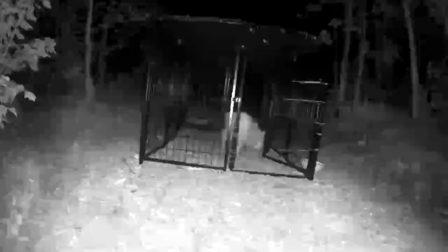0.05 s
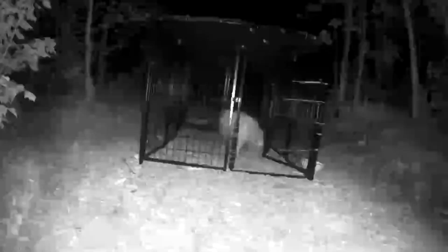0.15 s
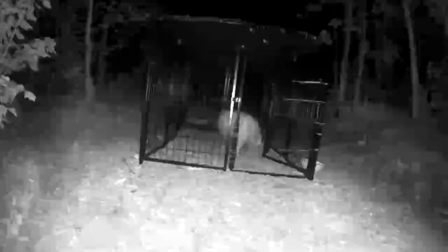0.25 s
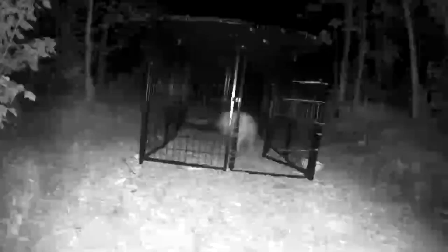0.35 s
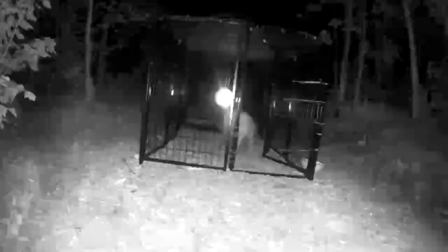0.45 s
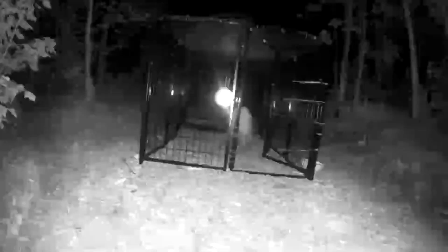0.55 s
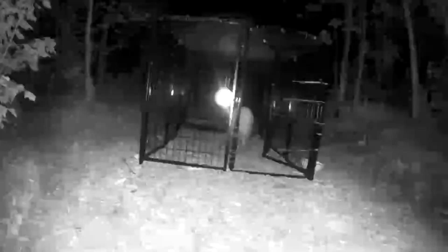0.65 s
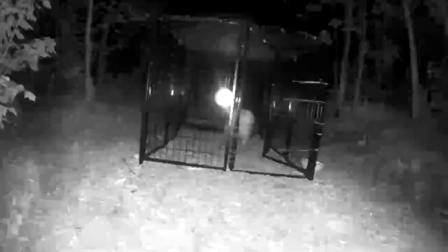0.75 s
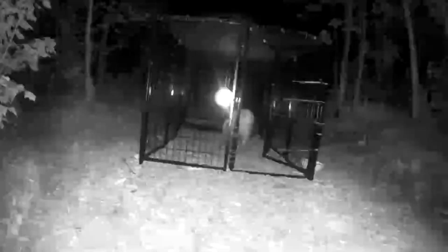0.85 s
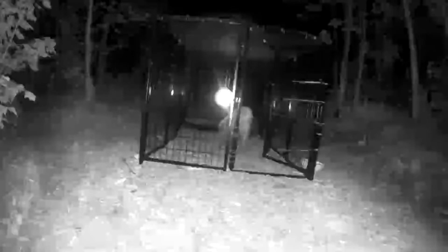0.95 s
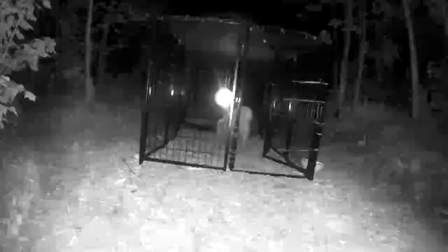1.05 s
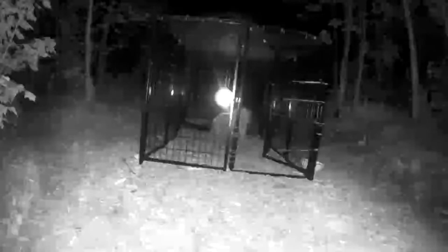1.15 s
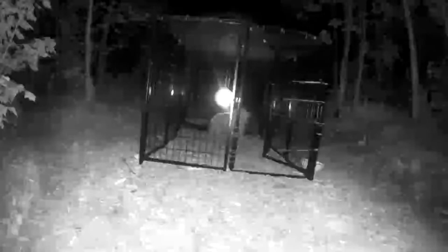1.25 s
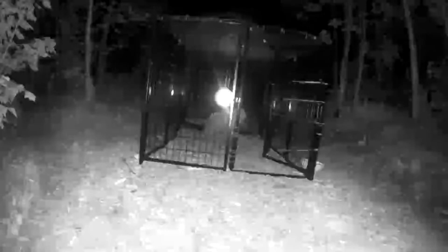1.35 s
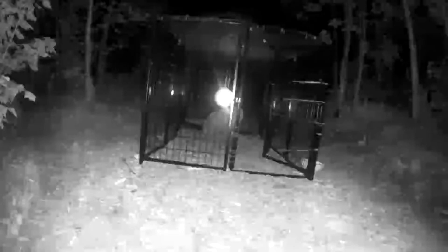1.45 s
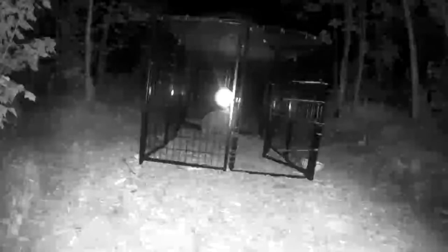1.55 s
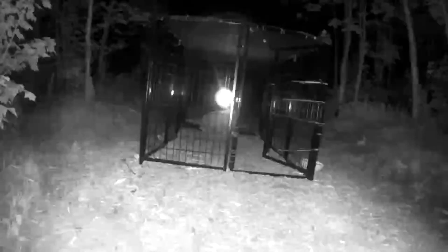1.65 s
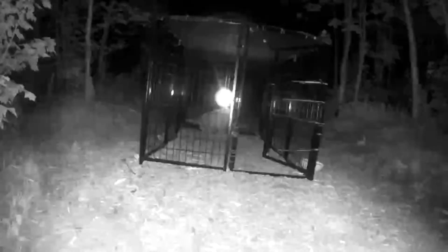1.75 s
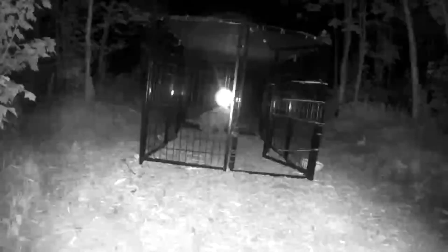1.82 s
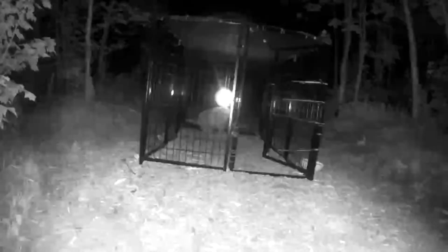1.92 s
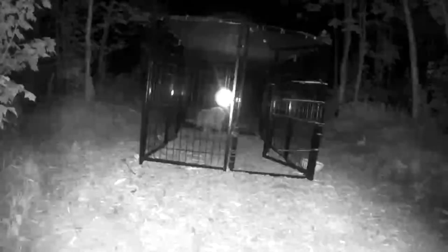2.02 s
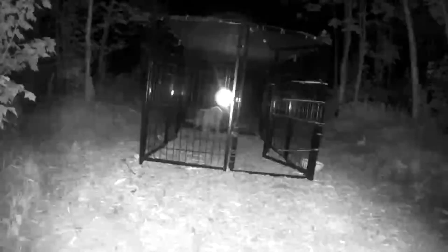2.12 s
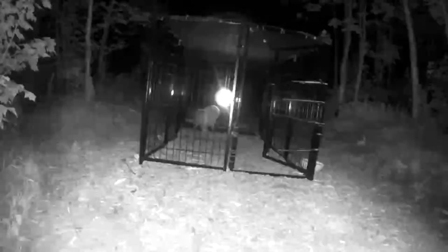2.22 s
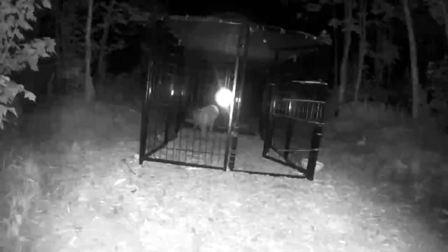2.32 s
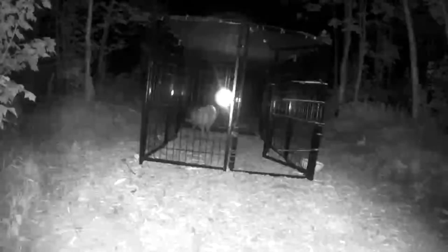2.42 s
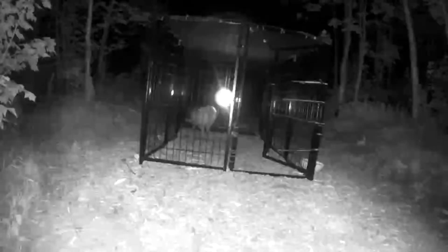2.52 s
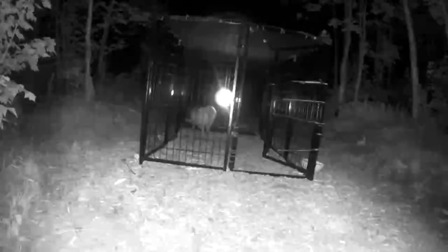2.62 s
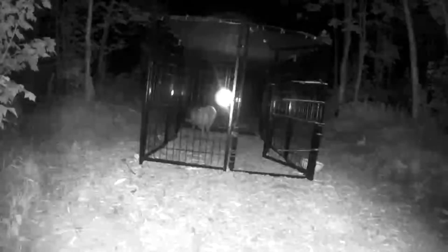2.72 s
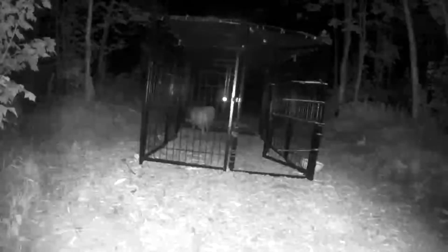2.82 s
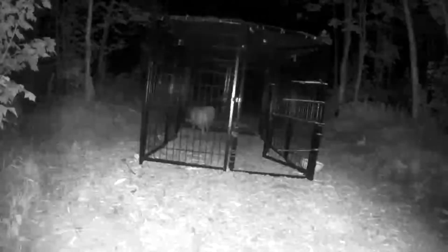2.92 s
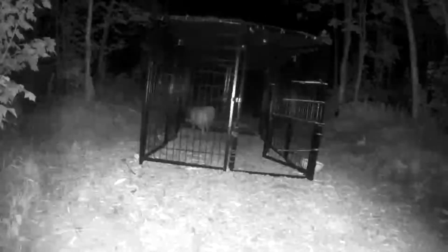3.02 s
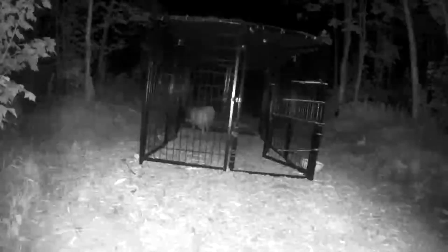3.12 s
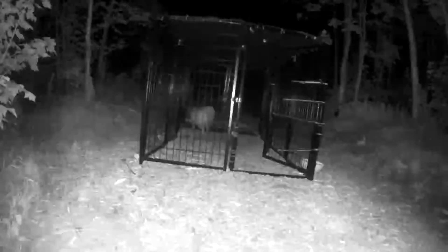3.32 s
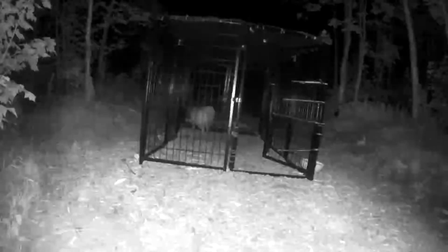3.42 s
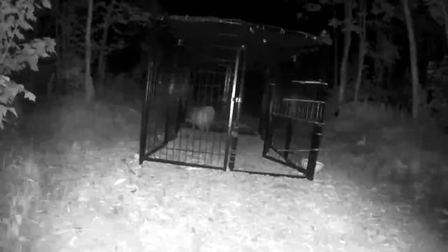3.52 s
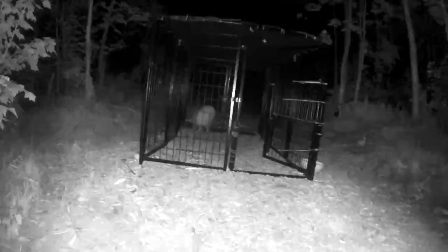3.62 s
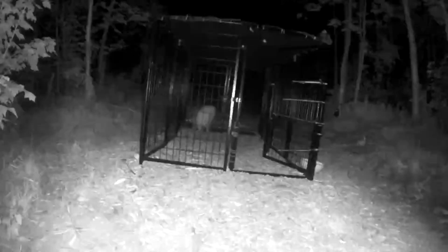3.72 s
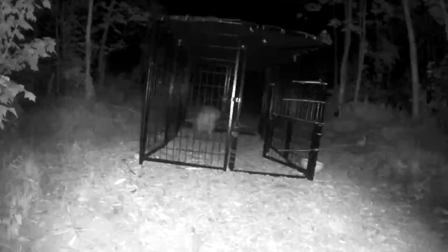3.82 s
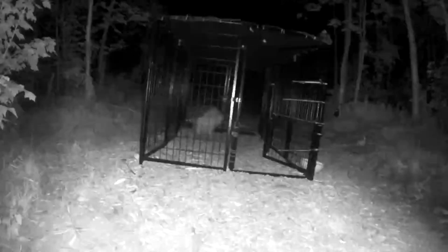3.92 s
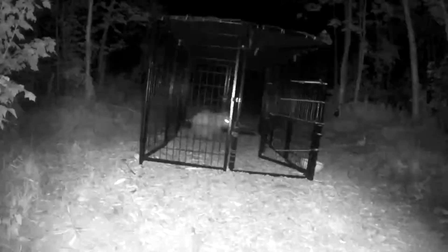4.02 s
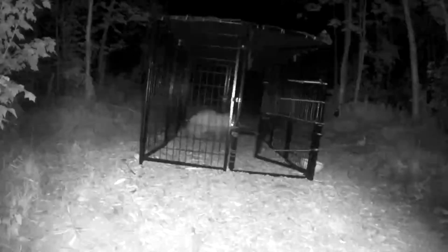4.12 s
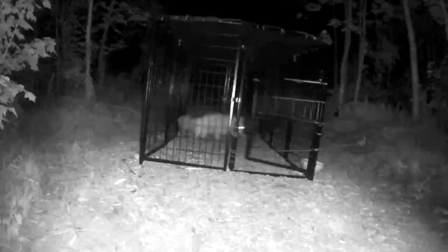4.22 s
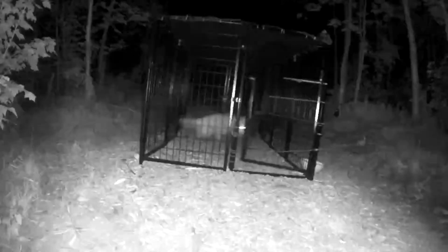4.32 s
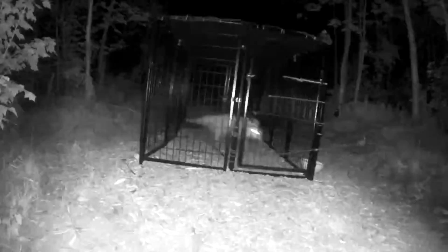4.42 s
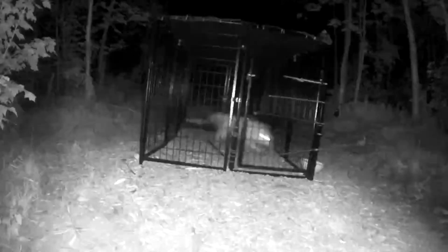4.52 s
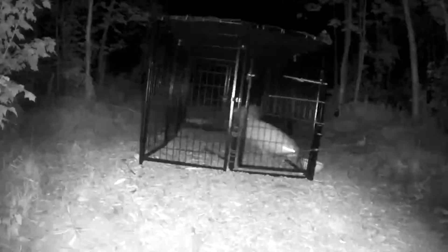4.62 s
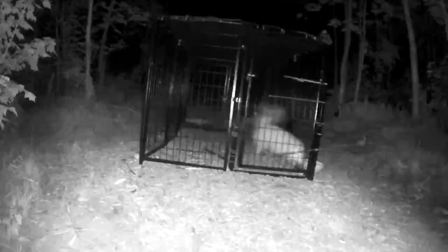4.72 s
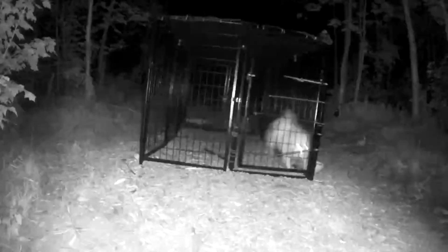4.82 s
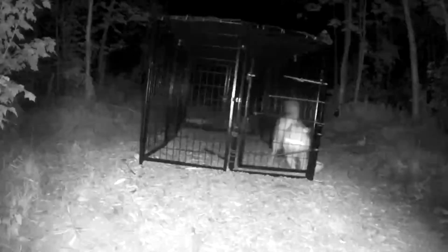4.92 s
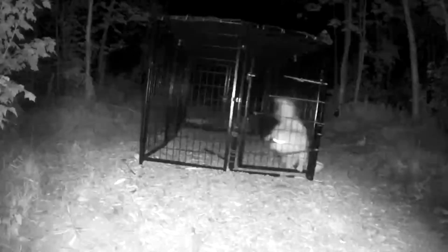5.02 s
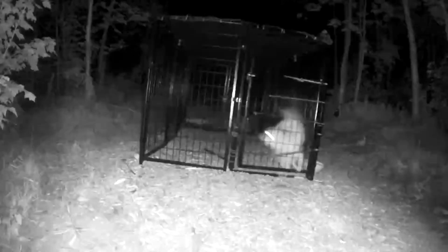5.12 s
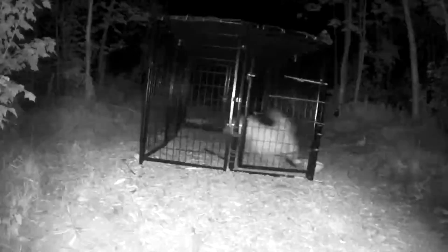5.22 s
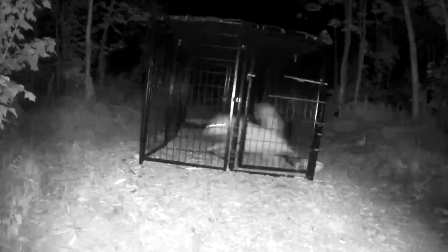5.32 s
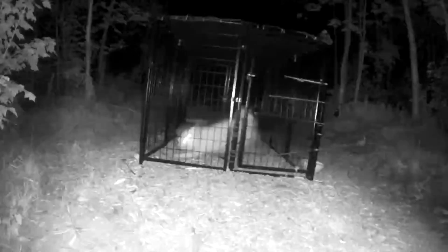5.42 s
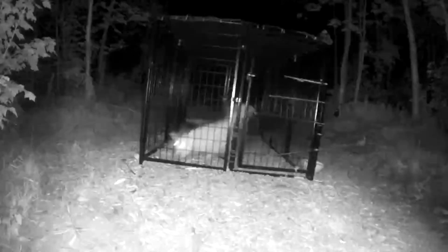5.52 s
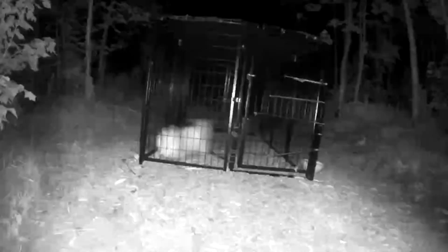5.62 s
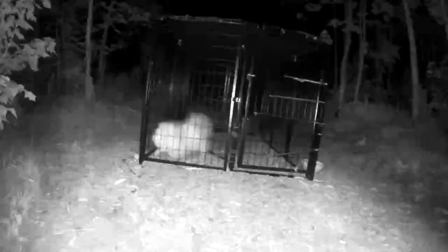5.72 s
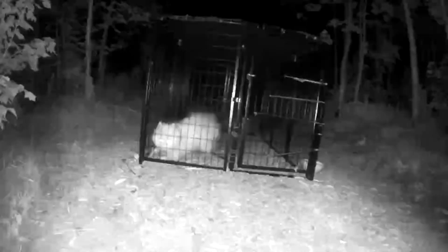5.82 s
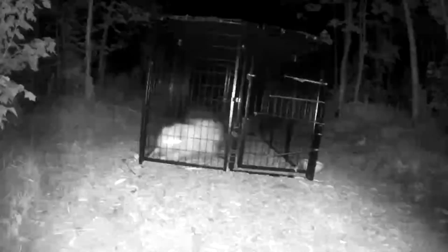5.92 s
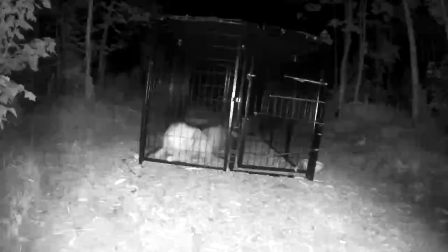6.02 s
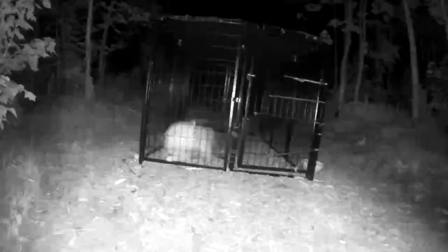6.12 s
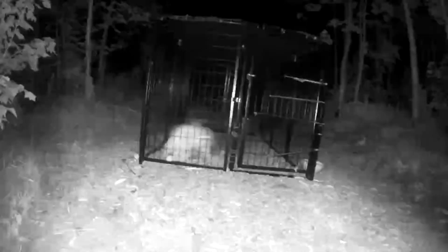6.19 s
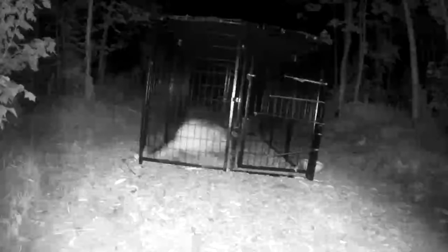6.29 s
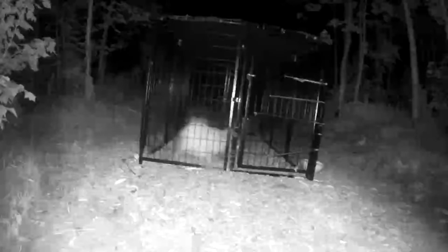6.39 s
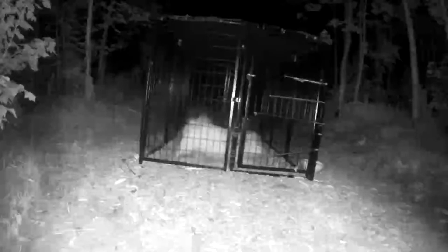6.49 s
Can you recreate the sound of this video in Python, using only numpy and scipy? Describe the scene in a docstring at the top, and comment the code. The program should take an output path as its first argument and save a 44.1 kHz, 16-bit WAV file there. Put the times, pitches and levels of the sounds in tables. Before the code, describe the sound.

A quiet wood at night, heard through a trail camera with a faint hiss and hum. A katydid buzzes softly, high and fast, over a distant insect chorus throughout. At about 3.5 seconds an animal's paws tap lightly on the floor of a steel cage trap. Wires begin to clink at 4 seconds, and at about 4.3 the door slams shut with a loud cluster of clanks, a low jolt and jangling mesh. Sharp, bright metal strikes continue until about 5 seconds, followed by a couple of knocks on the bars. From 5.4 to 6.2 seconds the animal throws itself against the sides: panels chatter, the shut door rattles, and feet thud dully on earth and scuffle in dry leaves. The metal rings briefly, with a thin echo from the trees. A last soft thud and light knock come at about 6.4 seconds.

```python
"""A wood at night, heard through a trail camera that hums faintly. A katydid buzzes by stridulation over
a far insect chorus. An animal steps about in a steel cage trap, the door slams shut, and the animal runs
against the mesh: impacts excite the modes of bars and wires, while feet thud on the earth and scuffle
in dry leaves. The trees scatter a thin reverberation, and the camera turns its gain down at the slam."""
import sys
import numpy as np
from scipy import signal
from scipy.fft import rfft, irfft, next_fast_len
from scipy.io import wavfile
from scipy.ndimage import uniform_filter1d

SR = 44100
rng = np.random.default_rng(int(sys.argv[2]) if len(sys.argv) > 2 else 0)


def wav_record(signal):
    """Record a signal, one row per channel, as 16-bit PCM in the file named by sys.argv[1]."""
    frames = np.transpose(np.atleast_2d(signal))
    bounded = np.clip(frames, -1, 1)
    # unit amplitude maps onto the largest positive 16-bit level
    quanta = np.round(bounded * 32767).astype(np.int16)
    wavfile.write(sys.argv[1], SR, quanta)


N = 288855
TIME = np.arange(N) / SR

# spectra of the far insects and of the camera's hiss: frequency_hz, relative_density_db
CHORUS_SPECTRUM = [(3400, -30), (3900, -8), (4200, -2), (4450, -2.5), (4750, 4.5), (5250, 1.5),
                   (5600, -18.5), (6200, -24.5)]
HISS_SPECTRUM = [(10, -5), (30, 3.5), (70, 0), (130, -1.5), (200, -6), (320, -10), (500, -13),
                 (1000, -10.5), (1600, -11), (2800, -14.5), (4000, -14), (5600, -9), (6800, -12),
                 (7500, -20.5)]
# partials of the camera's hum: pitch_hz, rms_db
HUM_PARTIALS = [(55.5, -63.5), (120, -57.5), (166.5, -77), (240, -69), (360, -68)]
# soft paws on the floor of the trap: start_s, peak_db, t60_s
PAW_TAPS = [(3.55, -42.5, 0.14), (3.603, -36.5, 0.063), (3.752, -41.5, 0.19), (3.811, -49.5, 0.11)]
# modes of that floor: pitch_hz, bandwidth_hz, gain_db
TRAP_FLOOR_MODES = [(314, 350, -7.5), (950, 110, -4), (1330, 120, -3.5), (1580, 60, -1), (2040, 810, -9),
                    (2520, 110, -3), (3000, 510, -18.5)]
# bursts of kicking the leaves and shaking the panels: start_s, length_s, leaves_db, panels_db
SCRAMBLE_BURSTS = [(4.215, 0.2, -54, -44.5), (4.524, .18, -43, -36.5), (5.418, 0.1, -42.5, -40.5),
                   (5.633, 0.083, -49, -42), (5.89, 0.042, -46, -52.5), (6.059, 0.029, -55.5, -48)]
# the mesh jangles as the animal turns, after the slam, and as it drops back: start_s, length_s, level_db
MESH_JANGLES = [(3.889, 0.17, -59.5), (4.32, 0.38, -30.5), (5.213, 0.23, -47)]
# spectra of scuffled leaves, loose panels and wires: frequency_hz, relative_density_db
LEAF_SPECTRUM = [(45, -5.5), (70, 2.5), (115, -3), (190, -7.5), (320, -5.5), (480, -9), (800, -7),
                 (1200, -4), (1600, -19), (3500, -34)]
PANEL_SPECTRUM = [(900, -20), (1400, 4.5), (1750, 4.5), (2300, 4.5), (2700, 6.5), (3100, 7), (3900, 3),
                  (4500, -6), (5500, -1)]
WIRE_SPECTRUM = [(3400, -4), (4300, -4), (4700, -2), (5200, 0.5), (5700, 0.5), (6350, 5), (6900, 5),
                 (7300, -2), (7700, -19)]
# modes of the cage that stand above the dense mesh modes: pitch_hz, relative_db, t60_s
STRONG_CAGE_MODES = [(861, 4, .3), (1136, 9, .5), (1250, 6, .45), (1610, 4, .4), (1793, 4, .25),
                     (1861, 6, .25), (2251, 5, .2), (2353, 1, .3), (2835, -2, .3), (3047, 3, .3),
                     (3526, -1, .3), (4049, 5, .35), (4525, -1, .25), (4603, 5, .25), (4792, -3, .2),
                     (4910, -2, .2), (5210, -1, .13), (5460, 0, .25), (5687, 0, .2), (6212, 0, .17),
                     (6346, 3, .2), (6912, 2, .17)]
# the animal's weight on the ground, and the jolt of the slam: start_s, level_db, pitch_hz, t60_s
GROUND_THUDS = [(3.69, -45, 82.6, 0.21), (4.211, -38, 222, 0.23), (4.237, -31, 119, 0.14),
                (4.292, -33, 387, 0.07), (4.365, -37, 430, 0.06), (5.429, -40, 88.8, 0.23),
                (5.499, -49, 120, 0.18), (5.635, -35.5, 85.4, 0.11), (5.781, -49.5, 90, 0.15),
                (5.958, -43, 68, 0.2), (6.101, -37.5, 114, 0.15), (6.381, -43, 106, 0.11)]
# bands in which frame, panels, bars, door, latch and wires ring: low_hz, high_hz
STEEL_BANDS = [(720, 1400), (1480, 2500), (2600, 4100), (4400, 4900), (4950, 5650), (5850, 7200)]
# band weights of each kind of blow: frame_db, panels_db, bars_db, door_db, latch_db, wires_db
WIRE_WEIGHTS = (-24.5, -27, -10.5, -16, -2.5, -1)
SLAM_WEIGHTS = (-17.5, -7.5, -6.5, -15.5, -13, -3)
BAR_WEIGHTS = (-20.5, -24, -1, -9, -8, 0.5)
PANEL_WEIGHTS = (-12, 1.5, -2.5, -5.5, -10.5, -7)
DOOR_WEIGHTS = (-21, -27, -7.5, -1, -15, -8)
# bright, thin strikes on latch and mesh: start_s, level_db, t60_s
WIRE_BLOWS = [(4.055, -47.5, 0.11), (4.094, -46, .11), (4.157, -34, 0.29), (4.188, -26.5, 0.18),
              (4.233, -41.5, 0.087), (4.38, -28, 0.078), (4.46, -29, .076), (4.509, -30, 0.54),
              (4.758, -34, 0.13), (4.847, -33, 0.12), (4.865, -21.5, 0.11), (4.948, -28, 0.05),
              (6.048, -33, 0.53), (6.142, -35, 0.15)]
# hard blows that shake the frame, led by the door hitting its stop and rebounding: start_s, level_db
SLAM_BLOWS = [(4.289, -22), (4.301, -21), (4.32, -35), (4.364, -26.5), (4.423, -27.5), (4.56, -29),
              (5.59, -26.5)]
# knocks on a bar: start_s, level_db
BAR_BLOWS = [(5.037, -32.5), (5.114, -38), (6.437, -43)]
# dull bumps against a side panel: start_s, level_db
PANEL_BLOWS = [(5.397, -39.5), (5.656, -45), (5.912, -34), (6.083, -42.5)]
# the shut door rattling in its guides: start_s, level_db
DOOR_BLOWS = [(5.598, -30), (5.656, -35), (5.699, -27), (5.712, -27.5), (6.054, -32.5), (6.111, -36)]


def from_db(db):
    """Amplitude ratio: a factor of ten per 20 dB."""
    return 10 ** (np.asarray(db) / 20)


def unit_rms(x):
    """Normalisation to unit mean power."""
    return x / np.sqrt(np.mean(x ** 2) + 1e-20)


def decay(t, t60_s):
    """Exponential damping, 60 dB down after t60_s."""
    return np.exp(-np.log(1000) * t / t60_s)


def add(out, start_s, sound):
    """Superposition: a sound sums into the mix from start_s."""
    at = round(start_s * SR)
    out[at:at + len(sound)] += sound[:max(0, N - at)]


def band(x, low_hz, high_hz):
    """Causal band-pass filtering."""
    return signal.sosfilt(signal.butter(2, [low_hz, high_hz], "band", fs=SR, output="sos"), x)


def resonance(x, hz, width_hz):
    """Forced response of a damped oscillator, with unit gain at its peak."""
    r = np.exp(-np.pi * width_hz / SR)
    feedback = [1, -2 * r * np.cos(2 * np.pi * hz / SR), r * r]
    return signal.lfilter(np.array([1, 0, -1]) * (1 - r * r) / 2, feedback, x + 1e-18)


def coloured(x, spectrum):
    """Spectral shaping, interpolated in log frequency; unit rms."""
    hz, db = np.transpose(spectrum)
    size = next_fast_len(N)
    log_hz = np.log(np.arange(size // 2 + 1) * SR / size + 1)
    gain = from_db(np.interp(log_hz, np.log(hz), db, left=-100, right=-100))
    return unit_rms(irfft(rfft(x, size) * gain, size)[:N])


def drift(knots_per_s):
    """Random modulation: linear interpolation between Gaussian values; unit rms."""
    knots = rng.standard_normal(N // 20)
    return unit_rms(np.interp(TIME * knots_per_s, np.arange(len(knots)), knots))


def katydid(strokes_per_s=55.1, start_hz=4906, end_hz=3927, waver_hz=40, swell_db=9, rms_db=-61):
    """Stridulation: each stroke is a falling, swelling chirp that drives a resonance of the wing."""
    cycle = (strokes_per_s * TIME + .025 * drift(8)) % 1
    travel = np.clip(cycle / .75, 0, 1)   # the wings close silently in the last quarter
    hz = start_hz + (end_hz - start_hz) * travel + waver_hz * drift(700)
    envelope = np.abs(np.sin(np.pi * travel)) ** .5 * from_db(swell_db * travel + .5 * drift(300))
    chirps = envelope * np.sin(2 * np.pi * np.cumsum(hz) / SR)
    song = chirps + 1.1 * resonance(chirps, hz=4250, width_hz=220)
    return from_db(rms_db) * unit_rms(trees(song, t60_s=.25, wet_db=-9, build_s=.005))


def trees(x, t60_s=.58, wet_db=-12, build_s=.0083):
    """Multiple scattering by trunks and foliage adds a thin reverberant tail."""
    t = TIME[:SR]
    echoes = rng.standard_normal(SR) * decay(t, t60_s) * (1 - np.exp(-t / build_s))
    return x + from_db(wet_db) * signal.fftconvolve(x, echoes / np.linalg.norm(echoes))[:N]


def insect_chorus(rms_db=-57):
    """Incoherent summation: many distant insects merge into a band of noise."""
    return from_db(rms_db) * coloured(rng.standard_normal(N), CHORUS_SPECTRUM)


def camera_noise(hiss_db=-59):
    """Self-noise: a continuous spectrum of hiss under a line spectrum of hum."""
    hiss = from_db(hiss_db) * coloured(rng.standard_normal(N), HISS_SPECTRUM)
    hum = sum(from_db(db) * np.sqrt(2) * np.sin(2 * np.pi * (hz * TIME + rng.random()))
              for hz, db in HUM_PARTIALS)
    return hiss + hum


def paw_taps():
    """Modal excitation: a padded paw drives the heavily damped resonances of the floor."""
    out, t = np.zeros(N), TIME[:SR // 2]
    for start_s, peak_db, t60_s in PAW_TAPS:
        force = rng.standard_normal(len(t)) * decay(t, t60_s)
        knock = sum(from_db(db) * resonance(force, hz, width_hz) * (-1) ** k
                    for k, (hz, width_hz, db) in enumerate(TRAP_FLOOR_MODES))
        add(out, start_s, from_db(peak_db) * knock / np.abs(knock).max())
    return out


def contacts(per_s, spread_db):
    """A Poisson process of clicks of uneven size; unit rms."""
    sizes = from_db(spread_db * np.minimum(rng.exponential(1, N), 4))
    signs = rng.choice([-1, 1], N)
    return unit_rms(sizes * signs * (rng.random(N) < per_s / SR))


def swell(start_s, length_s, rise_db_per_s, fall_db_per_s):
    """Exponential growth to unit gain at start_s, a plateau, then exponential decay."""
    early_s, late_s = np.maximum(start_s - TIME, 0), np.maximum(TIME - start_s - length_s, 0)
    return from_db(-rise_db_per_s * early_s - fall_db_per_s * late_s)


def struggle(stir_start_s=3.57, stir_rise_s=1.0, flutter_db=1.65):
    """Granular noise: many tiny contacts make leaves crackle, panels chatter and wires jingle."""
    stirring = np.clip((TIME - stir_start_s) / stir_rise_s, 0, 1)   # goes on between the bursts
    leaves, panels = from_db(-56.5) * stirring, from_db(-54.5) * stirring
    for start_s, length_s, leaves_db, panels_db in SCRAMBLE_BURSTS:
        effort = swell(start_s, length_s, rise_db_per_s=325, fall_db_per_s=59.5)
        leaves = np.hypot(leaves, from_db(leaves_db) * effort)   # incoherent sounds add in power
        panels = np.hypot(panels, from_db(panels_db) * effort)
    jangle = sum(from_db(db) * swell(start_s, length_s, rise_db_per_s=207, fall_db_per_s=59)
                 for start_s, length_s, db in MESH_JANGLES)
    wires = np.hypot(from_db(-1.5) * panels, jangle)   # they shake with the panels and on their own
    shaking = from_db(flutter_db * drift(70))
    scuffle = leaves * coloured(contacts(per_s=2500, spread_db=2), LEAF_SPECTRUM)
    chatter = panels * coloured(contacts(per_s=4000, spread_db=1), PANEL_SPECTRUM)
    jingle = wires * coloured(contacts(per_s=6000, spread_db=3.5), WIRE_SPECTRUM)
    return shaking * (scuffle + chatter + jingle)


def cage_ring(x, ring_db=-1):
    """Free vibration: the stronger modes of frame and bars ring on after every contact."""
    rings = sum(from_db(db) * resonance(x, hz, width_hz=np.log(1000) / (np.pi * t60_s))
                for hz, db, t60_s in STRONG_CAGE_MODES)
    return x + from_db(ring_db) * rings


def ground_thuds(edge_ratio=1.4, trim_db=-1):
    """Damped impact: a soft, heavy blow on earth gives a brief band of noise around a low pitch."""
    out, t = np.zeros(N), TIME[:SR // 2]
    for start_s, level_db, hz, t60_s in GROUND_THUDS:
        force = rng.standard_normal(len(t)) * decay(t, t60_s)
        thud = band(force, hz / edge_ratio, hz * edge_ratio)
        add(out, start_s, from_db(level_db + trim_db) * thud / np.abs(thud).max())
    return out


def clanks(blows, weights, crack, crack_t60_s, rise_s, chatter_db, t60_s=None, spot_db=1.57):
    """High modal density: after a chattering crack, close mesh modes die away as bands of noise."""
    out, t = np.zeros(N), TIME[:SR // 2]
    onset = slice(SR // 50)   # the first 20 ms set each band's level
    bounces = from_db(chatter_db * drift(400))
    for start_s, level_db, *own_t60_s in blows:
        tail = decay(t, own_t60_s[0] if own_t60_s else t60_s)
        envelope = (crack * decay(t, crack_t60_s) + tail) * (1 - np.exp(-t / rise_s))
        envelope *= np.roll(bounces, -round(start_s * SR))[:len(t)]
        for (low_hz, high_hz), weight_db in zip(STEEL_BANDS, weights):
            ring = band(rng.standard_normal(len(t)) * envelope, low_hz, high_hz)
            gain = from_db(level_db + weight_db + spot_db * rng.standard_normal())   # varies by spot hit
            add(out, start_s, gain * ring / np.std(ring[onset]))
    return out


def steel_blows():
    """Impact excitation: the part that is struck sets the spectrum, attack and damping."""
    wires = clanks(WIRE_BLOWS, WIRE_WEIGHTS, crack=.89, crack_t60_s=.014, rise_s=.00042, chatter_db=2)
    slams = clanks(SLAM_BLOWS, SLAM_WEIGHTS, crack=.98, crack_t60_s=.0075, rise_s=.0002,
                   chatter_db=-2, t60_s=.069)
    bars = clanks(BAR_BLOWS, BAR_WEIGHTS, crack=.59, crack_t60_s=.02, rise_s=.0013,
                  chatter_db=-1, t60_s=.21)
    panels = clanks(PANEL_BLOWS, PANEL_WEIGHTS, crack=.36, crack_t60_s=.012, rise_s=.00056,
                    chatter_db=.5, t60_s=.27)
    door = clanks(DOOR_BLOWS, DOOR_WEIGHTS, crack=.72, crack_t60_s=.015, rise_s=.00054,
                  chatter_db=1.5, t60_s=.18)
    return wires + slams + bars + panels + door


def scene():
    """Superposition at one microphone, the same in both channels."""
    trap = cage_ring(steel_blows() + struggle()) + paw_taps()
    mono = trees(trap) + ground_thuds() + katydid() + insect_chorus() + camera_noise()
    return np.array([mono, mono])


def gain_control(x, threshold_db=-23, release_db_per_s=3.0, attack_s=.019):
    """Compression: level above the threshold pulls the gain down quickly, and it recovers slowly."""
    power = uniform_filter1d(x[0] ** 2, size=700)
    excess_db = np.maximum(10 * np.log10(np.maximum(power, 1e-12)) - threshold_db, 0)
    recovery_db = release_db_per_s * TIME
    held_db = np.maximum.accumulate(excess_db + recovery_db) - recovery_db
    pole = np.exp(-1 / (attack_s * SR))
    return x * from_db(-signal.lfilter([1 - pole], [1, -pole], held_db))


def record(dry, ceiling=.4, shoulder_hz=7400, cutoff_hz=7600):
    """The camera's transfer chain: compression, soft saturation, then two low-pass filters."""
    rounded = ceiling * np.tanh(gain_control(dry) / ceiling)
    softened = signal.sosfilt(signal.butter(24, shoulder_hz, fs=SR, output="sos"), rounded)
    return signal.sosfilt(signal.ellip(10, .3, 70, cutoff_hz, fs=SR, output="sos"), softened)


dry = scene()
out = record(dry)
wav_record(out)
```